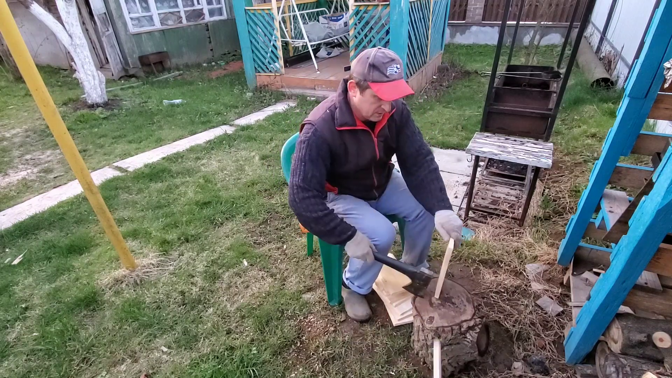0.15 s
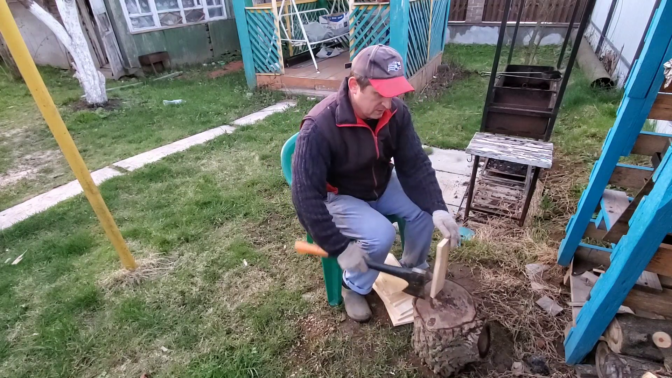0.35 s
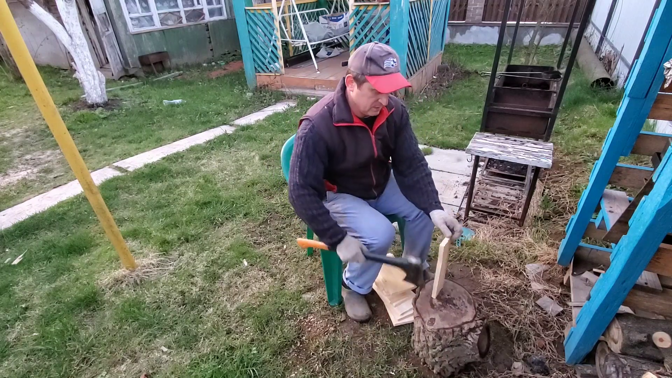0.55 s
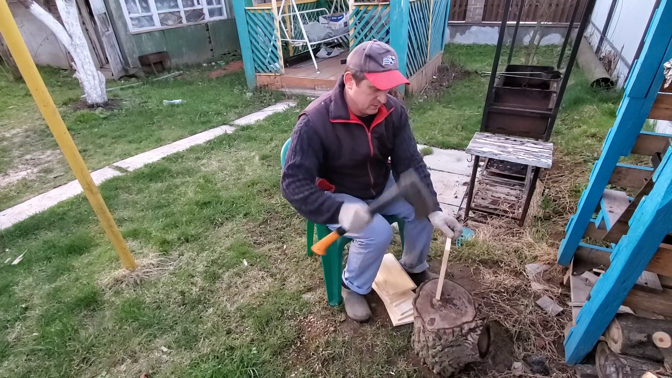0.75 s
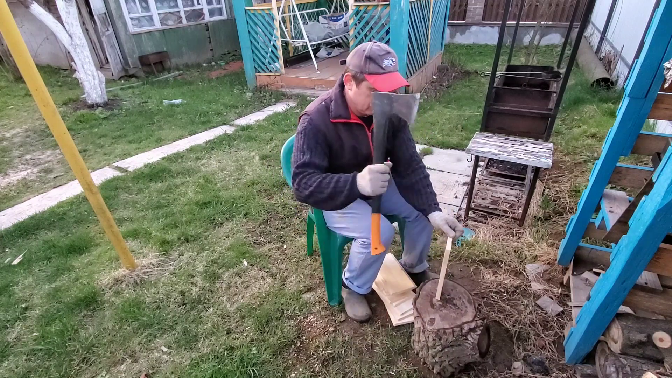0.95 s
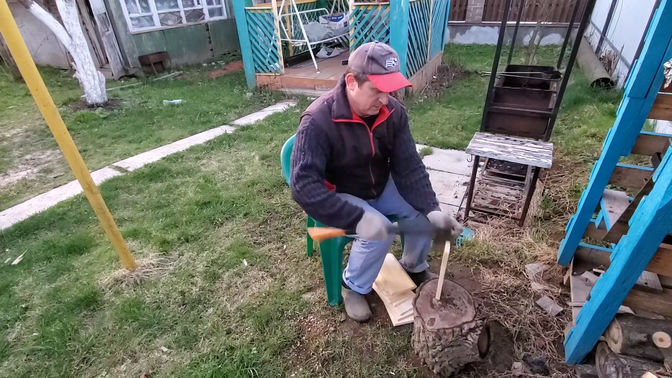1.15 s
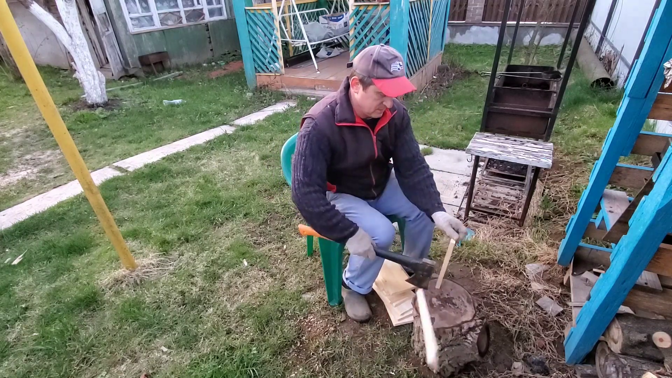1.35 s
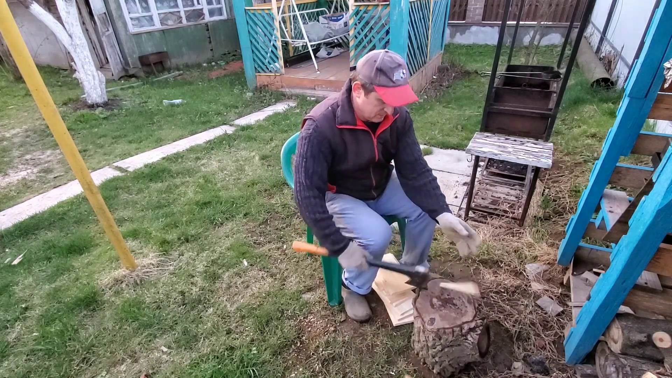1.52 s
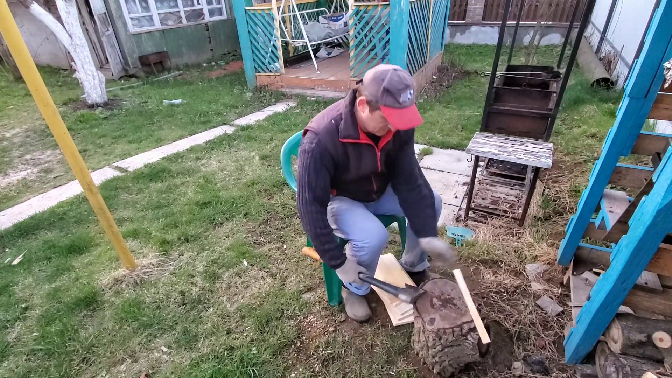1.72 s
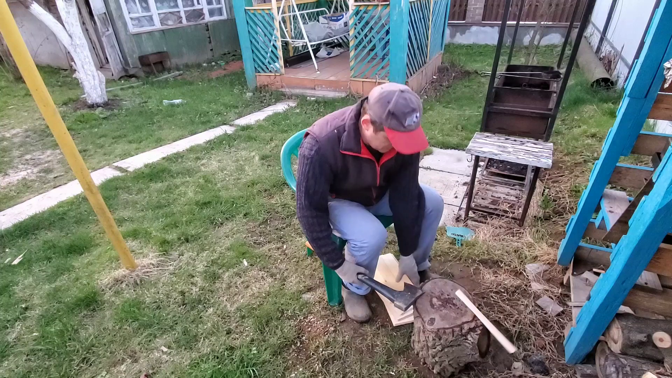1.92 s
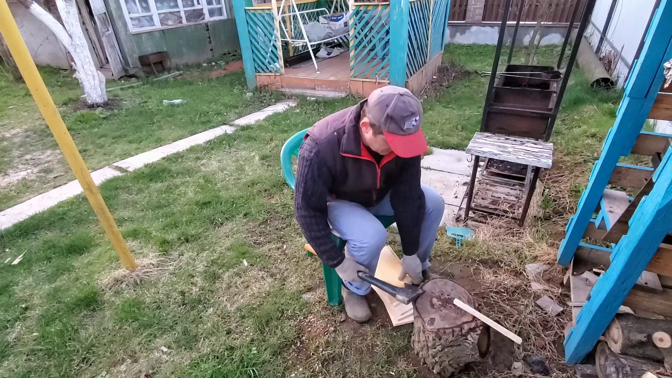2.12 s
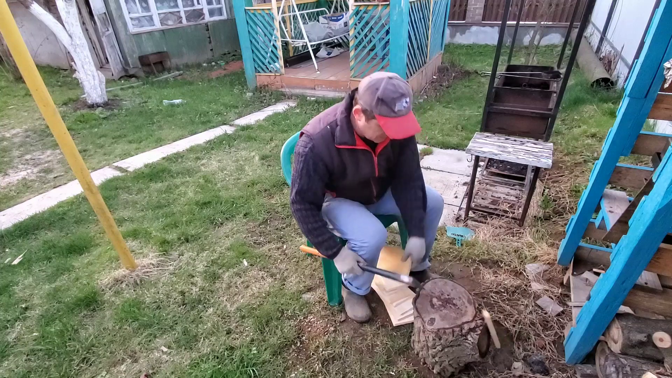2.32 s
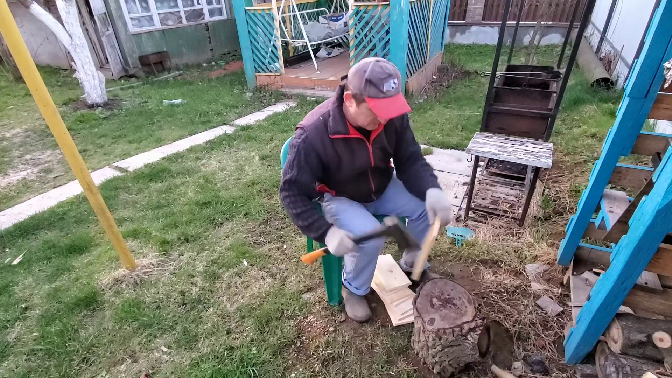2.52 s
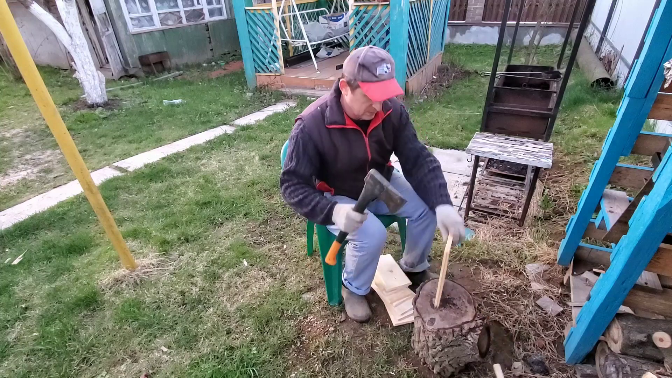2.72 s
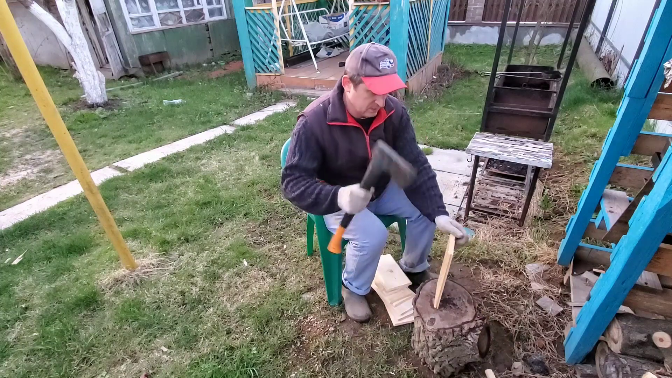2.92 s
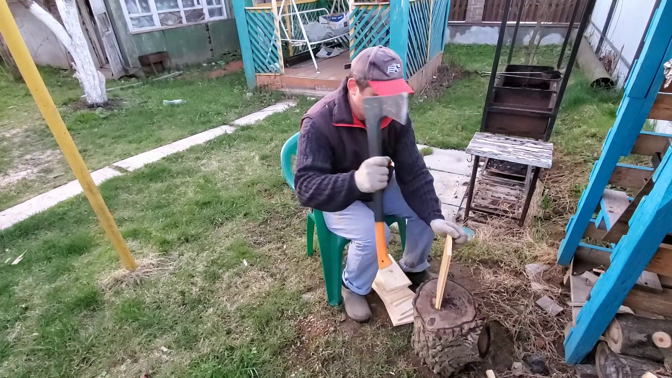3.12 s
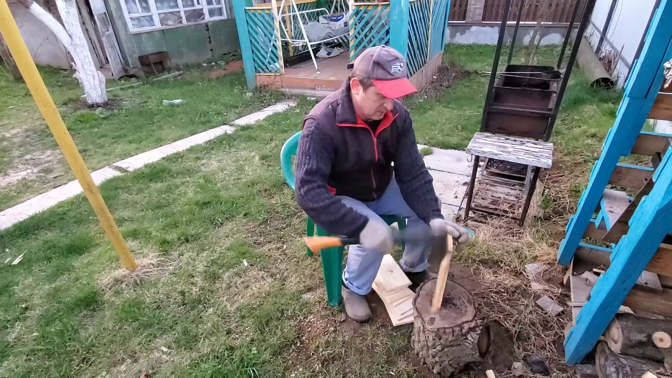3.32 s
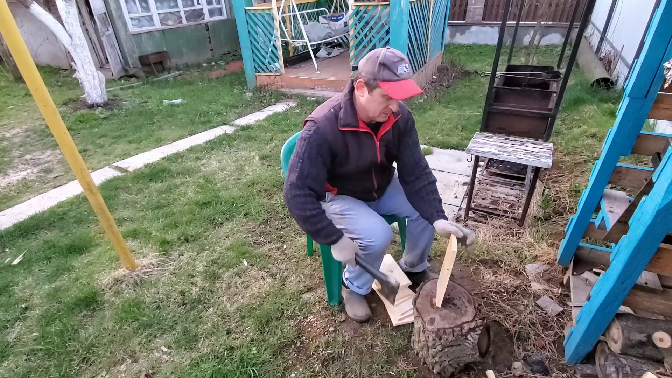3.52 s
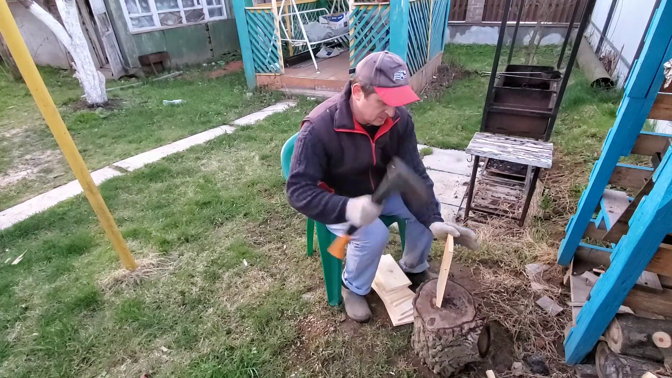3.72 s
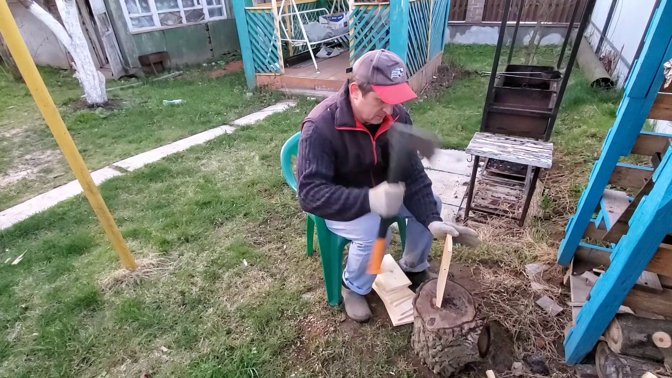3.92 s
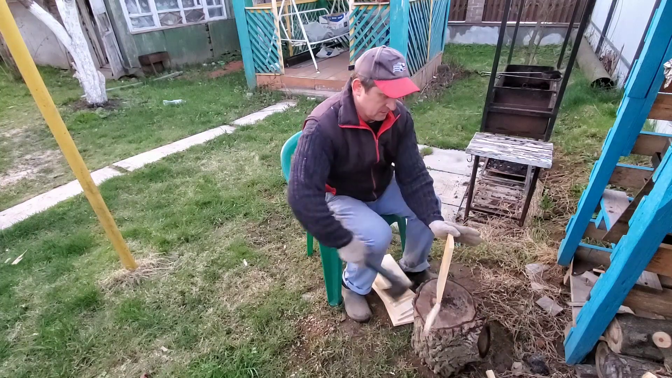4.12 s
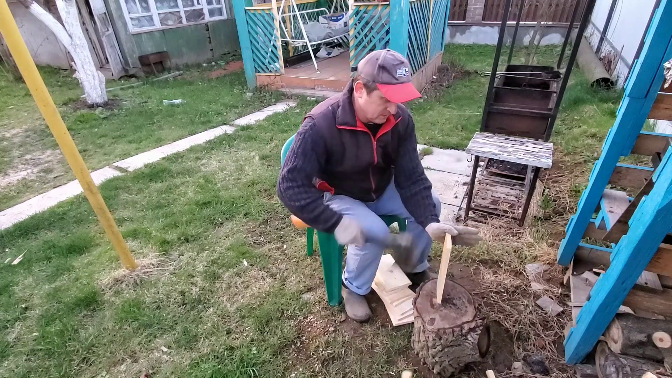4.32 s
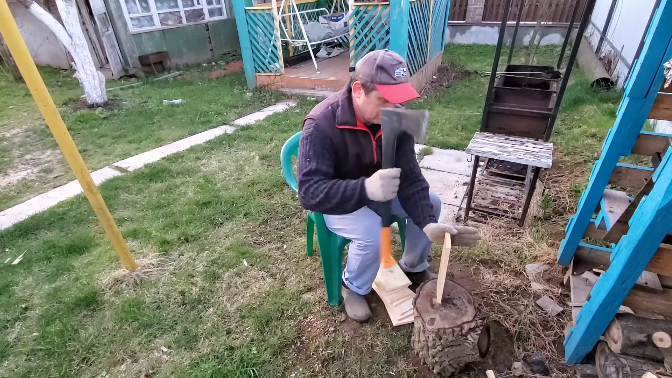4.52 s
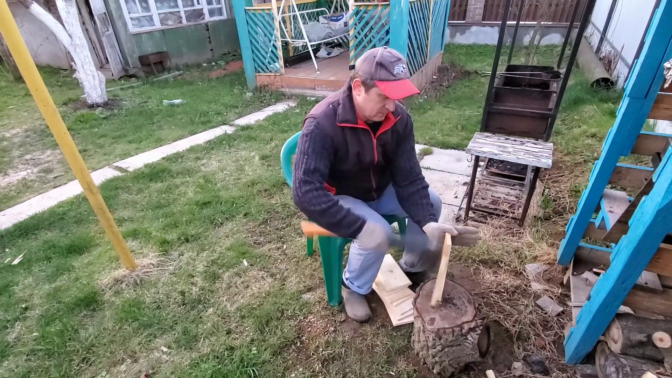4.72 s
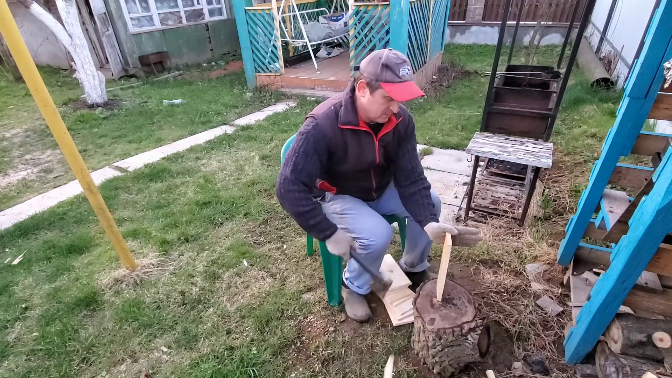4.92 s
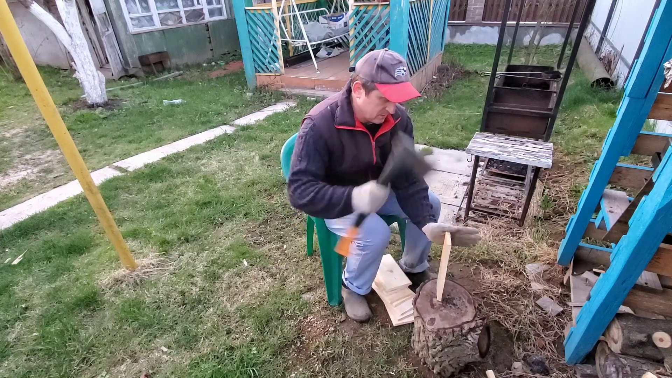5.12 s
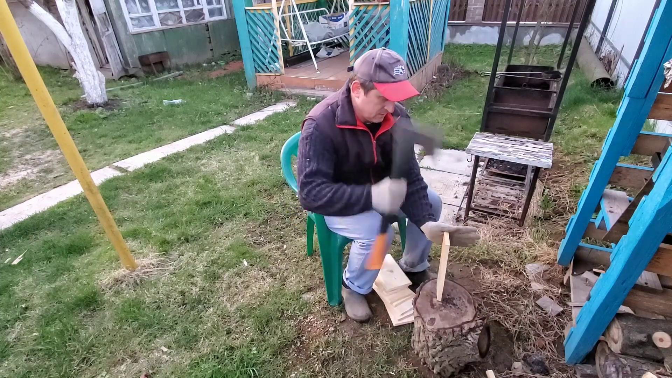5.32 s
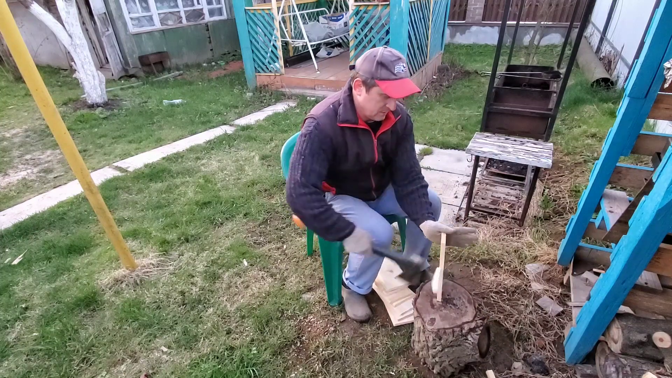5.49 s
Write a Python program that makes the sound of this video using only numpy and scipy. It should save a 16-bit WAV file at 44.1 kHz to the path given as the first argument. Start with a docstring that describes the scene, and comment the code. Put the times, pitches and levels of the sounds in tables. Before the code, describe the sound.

A hatchet splits kindling on a stump with sharp, irregular chops and clattering sticks, outdoors with faint distant birds.

```python
"""A hatchet splits kindling on a stump in a garden. Far birds whistle over a low outdoor rumble as the
first chop tears the wood fibres in a short crackle and the blade knocks through to the stump. A jacket
rustles between blows. After the second chop, freed sticks land end over end and ring. Two more chops
follow and more sticks fall; then the blade taps the held stick lightly before each of the last two
blows. Fences and house walls scatter every blow."""
import sys
import numpy as np
from scipy import signal
from scipy.fft import rfft, irfft, next_fast_len
from scipy.io import wavfile
from scipy.ndimage import uniform_filter1d, map_coordinates

SR = 44100
rng = np.random.default_rng(int(sys.argv[2]) if len(sys.argv) > 2 else 0)


def log_audio(samples):
    """Write samples as a 16-bit WAV file to the path given in sys.argv[1]."""
    # one column per channel
    frames = np.atleast_2d(samples).T
    # limit to full scale, then quantise
    limited = np.clip(frames, -1, 1)
    pcm = np.round(limited * 32767).astype(np.int16)
    wavfile.write(sys.argv[1], SR, pcm)


N = 249253
SIZE = 20000  # samples in one short sound
T = np.arange(SIZE) / SR
HZ = np.fft.rfftfreq(2 * SIZE, 1 / SR)

# tone colour of the distant rumble and of the faint hiss: f/Hz, relative level/dB
RUMBLE_SPECTRUM = [(12, -61.5), (20, -35), (23, -23), (31, -8.5), (41, -4.5), (54, 3), (103, -9.5),
                   (135, -21.5), (250, -27.5), (320, -56.5), (550, -120)]
HISS_SPECTRUM = [(120, -26.5), (200, -3.5), (465, -10), (671, -10), (1160, -16.5), (3370, -11.5),
                 (4350, -11), (5230, -16.5), (6640, -13), (8120, -24), (14900, -17.5), (16000, -24.5)]
# how loud the rumble is over time: t/s, level/dB
RUMBLE_LEVELS = [(0.0, -61.5), (0.31, -55), (1.18, -64.5), (1.49, -54.5), (1.72, -54.5), (1.98, -58.5),
                 (4.22, -63), (5.65, -64)]
# sliding bird notes: t/s, length/s, start f/Hz, end f/Hz, level/dB
SLIDES = [(0.0, .04, 3080, 2630, -65), (0.239, .14, 2750, 2160, -69), (0.658, .1, 2490, 2120, -74),
          (0.826, .15, 2003, 2350, -74.5), (2.334, .11, 4000, 3100, -66), (2.914, .03, 3694, 4020, -52.5),
          (3.098, .22, 1670, 1316, -78.5), (3.352, .055, 3376, 3170, -58.5), (5.074, .17, 8560, 7380, -73)]
# a rising bird note: start f/Hz, middle f/Hz, end f/Hz
RISING_PITCHES = [3500, 4140, 4710]
# raspy chirps and two-part bird calls: t/s, level/dB
CHIRPS = [(0.467, -64.5), (1.052, -59), (1.803, -58), (3.36, -65.5)]
CALLS = [(2.535, -59), (4.0, -58)]
# tones in the nasal squeak that opens a call: multiple of the pitch, relative level/dB
SQUEAK_PARTIALS = [(1, -13), (2, -1), (3, 0), (7, -16)]
# chops (t60 is the time a sound takes to fade by 60 dB): t/s, low body level/dB, mid crack level/dB,
# high fizz level/dB, wood resonance f/Hz, bending f/Hz, ring level/dB, ring t60/s, tearing time/s
CHOPS = [(0.0399, -20.5, -17, -22, 2890, 950, -38, 0.12, 0.0048),
         (1.2542, -26, -23.5, -27, 2910, 2330, -32, 0.11, 0.011),
         (3.416, -21, -13.5, -19, 1870, 859, -26.5, 0.24, 0.0097),
         (4.1192, -24.5, -20, -21.5, 3510, 716, -36.5, 0.22, 0.0061),
         (4.8001, -21.5, -14.5, -18, 2747, 904, -30, 0.32, 0.006),
         (5.508, -26.5, -13.5, -22, 2947, 994, -31, 0.071, 0.0055),
         (5.538, -30.5, -23, -24, 4580, 1010, -46, 0.29, 0.0048)]
# tone colour of snapping fibres, a hard click and rubbing cloth: f/Hz, relative level/dB
FIBRE_SPECTRUM = [(59, -20.5), (100, -13.5), (283, -9.5), (492, -4), (705, -3.5), (872, -2), (1580, -4),
                  (1830, -1.5), (2800, 1.5), (4110, 2), (4470, -0.5), (6700, -0.5), (7770, -7), (14700, -7),
                  (16000, -7)]
CLICK_SPECTRUM = [(150, -27), (500, -1), (1200, 4), (3000, 0), (6500, -7.5), (8500, -24.5), (16000, -31.5)]
CLOTH_SPECTRUM = [(200, -5.5), (700, -11), (2500, -4), (6500, -5.5), (8000, -16), (15000, -15)]
# blade and log knock on the stump: t/s, stump level/dB, log level/dB
KNOCKS = [(0.0969, -15, -23), (0.343, -48, -58), (1.288, -36, -30), (1.302, -32.5, -29), (1.3302, -18, -27),
          (1.376, -37, -40), (1.7255, -39, -39.5), (1.9105, -28, -26.5), (1.921, -37.5, -41.5),
          (2.8506, -29, -24), (2.404, -58, -59), (4.201, -33, -33.5), (4.309, -60, -44.5),
          (5.5358, -33, -20.5)]
# modes (natural tones) of the stump and of the log standing on it: f/Hz, relative level/dB, t60/s
STUMP_MODES = [(168, -10.5, 0.051), (270, -6, 0.043), (351, -3, 0.031), (430.8, -4, 0.072),
               (501, -1.5, 0.064), (675, -9.5, 0.072)]
LOG_MODES = [(780, -4, 0.019), (973.5, 1, 0.017), (1056, -5, 0.023), (1390, -5.5, 0.0097),
             (1990, -13, 0.016), (2533, -13, 0.02), (3420, -17.5, 0.025)]
# dull bumps of wood, handle and boots on grass: t/s, level/dB, f/Hz, soil level/dB
BUMPS = [(0.097, -24, 228, -50), (1.33, -26, 228, -50), (0.344, -43, 167, -37), (0.548, -50.5, 193.8, -52),
         (1.608, -38, 178.1, -56.5), (3.771, -48, 221, -53), (4.052, -48, 218, -66.5),
         (4.202, -33, 233, -44.5), (5.125, -49, 221.7, -58.5)]
# strong brushes of sleeve, glove and bark: t/s, level/dB, length/s
BRUSHES = [(0.509, -60, 0.11), (2.246, -59.5, 0.136), (2.333, -64, 0.1), (2.736, -56.5, 0.058),
           (2.896, -54, 0.075), (2.946, -56, 0.052), (3.747, -56, 0.048), (3.805, -58, 0.055)]
# loose sticks land: t/s, first end level/dB, second end level/dB, f/Hz,
# click level/dB relative to the ring, factor on the second end's ring time
LANDINGS = [(1.304, -34, -29, 1182, -18, 1.15), (1.611, -56, -62, 1186, 10, .7),
            (1.7255, -44, -41, 1443, -26, 1.3), (1.7258, -47, -56, 1179, 5, .25),
            (1.8375, -20.5, -15, 1179, -4, .8), (2.0815, -59, -63, 1290, 0, .4),
            (2.1385, -55, -62, 1220, 0, .4), (2.2409, -60, -66, 1290, 0, .4),
            (4.4058, -18, -20, 1179, -17, .42), (4.4694, -34, -42, 1179, -18, .5),
            (4.4892, -28, -33, 1179, -14, .5)]
# modes of a thin loose stick and of a stick held in the hand: f/Hz, relative level/dB, t60/s
LOOSE_STICK_MODES = [(1050, -7, .11), (1179, 0, .18), (1335, -15, .07), (2024, -7, .06), (2266, -2, .08),
                     (2430, -5, .06), (2869, 0, .12), (3000, -6, .06), (3914, -11, .05), (5303, -17, .07)]
HELD_STICK_MODES = [(850, -3.5, .05), (1090, -1, 0.023), (1321, -1.5, 0.061), (2297, -4, 0.085),
                    (2440, -2, 0.09), (3100, -7.5, 0.025), (4200, -15, .05), (7000, -25, 0.068)]
# the blade is set lightly against the held stick: t/s, level/dB
TAPS = [(4.738, -50), (4.7455, -46), (4.775, -50), (5.315, -44), (5.335, -49.5), (5.4762, -46.5)]
# how long the garden echoes: f/Hz, t60/s
ECHO_DECAY = [(100, 0.45), (500, 0.3519), (2000, 0.2741), (5000, 0.3438), (9000, 0.2342), (15000, 0.23)]
# tone colour of that echo: f/Hz, relative level/dB
ECHO_SPECTRUM = [(100, -4), (500, -12), (1200, -7), (3500, -10.5), (12000, -3)]
# how much louder the left side is than the right: f/Hz, level/dB
LEFT_OVER_RIGHT = [(200, -1), (600, 1.5), (1500, 3), (5000, 3.5), (14000, 2.7)]
# how the microphone lifts or lowers each frequency: f/Hz, level/dB
MICROPHONE_RESPONSE = [(18, -16), (30, -6), (45, 1.5), (6000, -0.5), (7200, 0.5), (8200, 0.5), (10500, 1),
                       (13000, 0.5), (15000, 2.5)]


def amp(db):
    """Turn decibels into a factor to multiply by."""
    return 10 ** (np.asarray(db) / 20)


def unit(x):
    """Scale a signal to an average strength (rms) of 1."""
    return x / np.sqrt(np.mean(x ** 2) + 1e-20)


def crest(x):
    """Scale a sound so that its loudest 3 ms have rms 1."""
    return x / np.sqrt(uniform_filter1d(x ** 2, size=132).max() + 1e-20)


def along(points, hz):
    """Read between a table's (f/Hz, value) points on a log frequency axis."""
    f, values = np.transpose(points)
    return np.interp(np.log(hz + 1), np.log(f + 1), values)


def fade(t60, t=T):
    """Die away by 60 dB every t60 seconds."""
    return np.exp(-np.log(1000) * t / t60)


def colour(x, gain):
    """Filter by a gain for each of HZ, with no sound ahead of the hit (minimum phase)."""
    cepstrum = irfft(np.log(np.maximum(gain, 1e-6)))
    cepstrum[1:SIZE] *= 2
    cepstrum[SIZE + 1:] = 0
    return irfft(rfft(x, 2 * SIZE) * np.exp(rfft(cepstrum)))[:SIZE]


def add(track, s, sound):
    """Mix a sound in at s seconds."""
    part = track[:, round(s * SR):][:, :SIZE]
    part += sound[..., :part.shape[1]]


def steady_noise(spectrum, side_db):
    """Even stereo noise of rms 1; a lower side_db makes it narrower."""
    gain = amp(along(spectrum, np.fft.rfftfreq(2 ** 18, 1 / SR)))
    mid, side = irfft(rfft(rng.standard_normal((2, 2 ** 18))) * gain)[:, :N]
    return unit(np.array([mid + amp(side_db) * side, mid - amp(side_db) * side]))


def outdoors(hiss_db=-76.8, swing_db=1.5, swings_per_s=3):
    """A distant rumble, nearly mono, and a faint wide hiss whose level drifts."""
    rumble_db = np.interp(np.arange(N) / SR, *np.transpose(RUMBLE_LEVELS))
    swings = rng.standard_normal(int(N * swings_per_s / SR) + 4)
    drift = map_coordinates(swings, [np.arange(N) * swings_per_s / SR])
    rumble = amp(rumble_db) * steady_noise(RUMBLE_SPECTRUM, side_db=-12.5)
    hiss = amp(hiss_db + swing_db * drift) * steady_noise(HISS_SPECTRUM, side_db=-3.5)
    return rumble + hiss


def bird_note(pitches, length_s, flutter_hz=65, partials=((1, 0),)):
    """A whistle swells and fades as it glides through its pitches, wavering at random."""
    progress = np.clip(T / length_s, 0, 1)
    curve = np.polyfit(np.linspace(0, 1, len(pitches)), pitches, len(pitches) - 1)
    flutter = flutter_hz * unit(uniform_filter1d(rng.standard_normal(SIZE), size=50))
    phase = 2 * np.pi * np.cumsum(np.polyval(curve, progress) + flutter) / SR
    swell = 2 * np.sqrt(progress * (1 - progress))
    return swell * sum(amp(db) * np.sin(k * phase) for k, db in partials)


def birds(run_start_s=.249, run_step_s=.1325, run_db=-77):
    """Slides, a run of six rising notes, raspy chirps and two-part calls, far off and rich in echo."""
    notes = [(s, db, bird_note([start_hz, end_hz], length))
             for s, length, start_hz, end_hz, db in SLIDES]
    notes += [(run_start_s + k * run_step_s, run_db, bird_note(RISING_PITCHES, length_s=.056))
              for k in range(6)]
    notes += [(s, db, bird_note([6000, 6200, 5000], length_s=.039, flutter_hz=480)) for s, db in CHIRPS]
    for s, db in CALLS:
        squeak = bird_note([2151, 2114, 2033], length_s=.04, flutter_hz=25, partials=SQUEAK_PARTIALS)
        whistle = bird_note([8160, 8680, 8260], length_s=.13)
        notes += [(s, db, squeak), (s + .011, db - 7.5, whistle)]
    out = np.zeros((2, N))
    for s, db, sound in notes:
        add(out, s, garden(amp(db) * sound, echo_db=6, lag_s=0))
    return out


def garden(x, echo_db=0, lag_s=.00013, build_s=.0078):
    """A sound arrives directly, bounces off the ground and things close by, and echoes off the walls."""
    hz, t, noise = signal.stft(rng.standard_normal((2, SIZE)), SR, nperseg=256)
    decay = fade(along(ECHO_DECAY, hz)[:, None], t)
    tail = signal.istft(noise * decay, SR, nperseg=256)[1][:, :SIZE]
    tail = unit(tail * (1 - np.exp(-T / build_s))) / np.sqrt(SIZE)
    far = amp(echo_db + along(ECHO_SPECTRUM, HZ)) * rfft(tail, 2 * SIZE)
    bounces = unit(rng.standard_normal((2, SIZE)) * T * fade(t60=.022)) / np.sqrt(SIZE)
    short_waves = HZ / np.hypot(HZ, 1600)  # small things scatter only these
    near = amp(-2.5) * rfft(bounces, 2 * SIZE) * short_waves
    direct = np.exp(-2j * np.pi * HZ * np.array([[lag_s], [0]]))  # the left side hears it lag_s later
    balance = amp(np.array([[.5], [-.5]]) * along(LEFT_OVER_RIGHT, HZ))
    return irfft(rfft(x, 2 * SIZE) * (direct + near + far) * balance)[:, :SIZE]


def ring(modes, pitch_factor=1, scatter_db=4, time_factor=1):
    """Struck wood rings in fading tones; scatter_db varies their strengths from blow to blow."""
    chance_db = scatter_db * rng.standard_normal(len(modes))
    sound = np.zeros(SIZE)
    for k, (hz, db, t60) in enumerate(modes):
        tone = (-1) ** k * np.sin(2 * np.pi * hz * pitch_factor * T)
        sound += amp(db + chance_db[k]) * fade(t60 * time_factor) * tone
    return crest(sound)


def soil_thud(low_hz=66, high_hz=110, rise_s=.016):
    """The soil under the stump gives one low thud that swells and fades."""
    swell = (1 - np.exp(-(T / rise_s) ** 2)) * fade(t60=.069)
    low = np.sin(2 * np.pi * low_hz * rng.uniform(.94, 1.1) * T)
    high = np.sin(2 * np.pi * high_hz * rng.uniform(.95, 1) * T)
    return crest(swell * (low + .55 * high))


def chops(rise_s=.0028, spikiness=.5, resonance_db=6, resonance_width_hz=130):
    """The edge bites, the split runs down the wood in a burst of snapping fibres, the piece rings on."""
    out = np.zeros((2, N))
    low = 1 / (1 + (HZ / 1400) ** 6)
    high = 1 / (1 + (7000 / (HZ + 1)) ** 12)
    for s, body_db, crack_db, fizz_db, wood_hz, bend_hz, ring_db, ring_t60, tearing_s in CHOPS:
        bite = 1 - np.exp(-(T / rise_s) ** 3)
        since_split = np.maximum(T - rise_s / 2 - tearing_s, 0)
        tear = bite * fade(t60=.033, t=since_split)
        snaps = tear * rng.standard_normal(SIZE) * np.exp(spikiness * rng.standard_normal(SIZE))
        peak_db = resonance_db / (1 + ((HZ - wood_hz) / resonance_width_hz) ** 2)
        wood = amp(along(FIBRE_SPECTRUM, HZ) + peak_db)
        body = amp(body_db) * crest(colour(snaps, wood * low))
        crack = amp(crack_db) * crest(colour(snaps, wood * (1 - low) * (1 - high)))
        fizz = amp(fizz_db) * crest(colour(snaps, wood * high))
        # the piece bends flatways and, at a higher pitch, edgeways
        bending = amp(ring_db) * bite * ring([(bend_hz, 0, ring_t60), (bend_hz * 1.233, -5, ring_t60)])
        chop = garden(body + crack + fizz) + garden(bending, echo_db=-15)
        add(out, s, chop + amp(body_db - 19.5) * soil_thud())
    return out


def click(t60):
    """Two hard things meet with a brief, dry crack."""
    return crest(colour(rng.standard_normal(SIZE) * fade(t60), amp(along(CLICK_SPECTRUM, HZ))))


def knocks():
    """A blunt blow rings the stump and the log on it; the harder it is, the more the soil shakes."""
    out = np.zeros((2, N))
    for s, stump_db, log_db in KNOCKS:
        log = ring(LOG_MODES) + amp(-22) * click(t60=.046)
        wood = amp(stump_db) * ring(STUMP_MODES) + amp(log_db) * log
        add(out, s, garden(wood, echo_db=-5) + amp(stump_db - 15.5) * soil_thud())
    return out


def bumps(rise_s=.005):
    """Wood, handle and boots meet the grass softly: a few low waves and no click."""
    out = np.zeros((2, N))
    for s, db, hz, soil_db in BUMPS:
        swell = (1 - np.exp(-T / rise_s)) * fade(t60=.055)
        thump = crest(swell * np.sin(2 * np.pi * hz * T))
        add(out, s, garden(amp(db) * thump, echo_db=-.5) + amp(soil_db) * soil_thud())
    return out


def brushes(graininess=.47, fidgets_per_s=2.4, fidget_db=-69.5, fidget_s=.1):
    """Cloth and bark rub in short, grainy strokes that swell and fade; faint ones come at random."""
    out = np.zeros((2, N))
    gap_s = 1 / fidgets_per_s
    starts = np.arange(0, N / SR - gap_s, gap_s)
    fidgets = [(s + rng.random() * gap_s, fidget_db, fidget_s) for s in starts]
    for s, db, length in BRUSHES + fidgets:
        progress = 6 * T / length
        swell = progress ** 2 * np.exp(-progress)
        grains = rng.standard_normal(SIZE) * np.exp(graininess * rng.standard_normal(SIZE))
        rustle = crest(colour(swell * grains, amp(along(CLOTH_SPECTRUM, HZ))))
        add(out, s, garden(amp(db) * rustle))
    return out


def landings(stick_hz=1179, slap_s=.0064, first_ring_factor=.3, lag_s=.00007):
    """A dry stick lands on one end, slaps down with the other and then rings like a wooden bar."""
    out = np.zeros((2, N))
    for s, first_db, second_db, hz, click_db, ring_factor in LANDINGS:
        tilt_db_per_octave = .22 * click_db  # a softer click means weaker high tones
        modes = [(f, db + tilt_db_per_octave * np.log2(f / stick_hz), t60)
                 for f, db, t60 in LOOSE_STICK_MODES]
        for delay, db, factor in [(0, first_db, first_ring_factor), (slap_s, second_db, ring_factor)]:
            bar = ring(modes, pitch_factor=hz / stick_hz, scatter_db=0, time_factor=factor)
            underneath = amp(-7.5) * ring(LOG_MODES, pitch_factor=rng.uniform(1, 1.9), time_factor=.17)
            contact = underneath + amp(click_db) * click(t60=.045)
            landing = garden(bar, echo_db=-12.5, lag_s=lag_s) + garden(contact, echo_db=-4, lag_s=lag_s)
            add(out, s + delay, amp(db) * landing)
    return out


def taps():
    """The edge touches the stick, and the hand holding it cuts the ring short."""
    out = np.zeros((2, N))
    for s, db in TAPS:
        tap = ring(HELD_STICK_MODES) + amp(-7) * click(t60=.12)
        add(out, s, garden(amp(db) * tap, echo_db=-3))
    return out


def scene():
    """Everything that sounds in the garden."""
    return outdoors() + birds() + chops() + knocks() + bumps() + brushes() + landings() + taps()


def record(dry, ceiling=.8, top_hz=15800):
    """The microphone thins the deepest bass, lifts the treble, rounds peaks and cuts off above top_hz."""
    size = next_fast_len(N + SIZE)
    hz = np.fft.rfftfreq(size, 1 / SR)
    bright = irfft(rfft(dry, size) * amp(along(MICROPHONE_RESPONSE, hz)), size)
    rounded = bright / (1 + (bright / ceiling) ** 4) ** (1 / 4)
    return irfft(rfft(rounded) / (1 + (hz / top_hz) ** 160), size)[:, :N]


dry = scene()
out = record(dry)
log_audio(out)
```